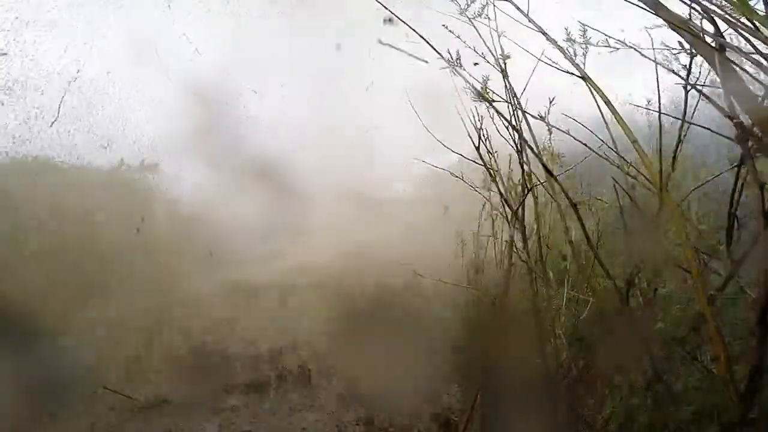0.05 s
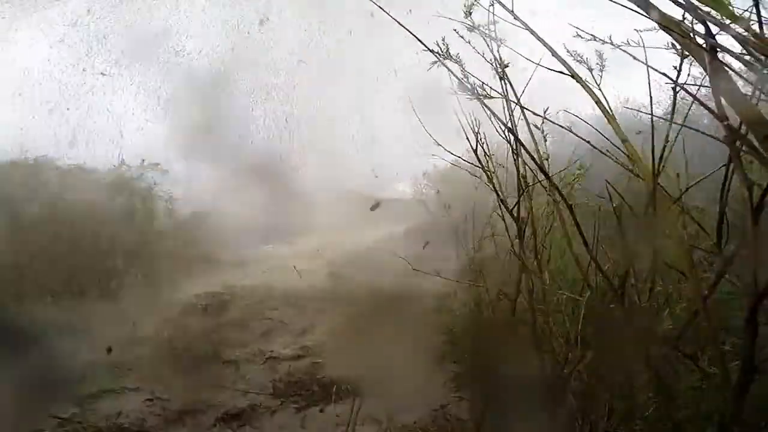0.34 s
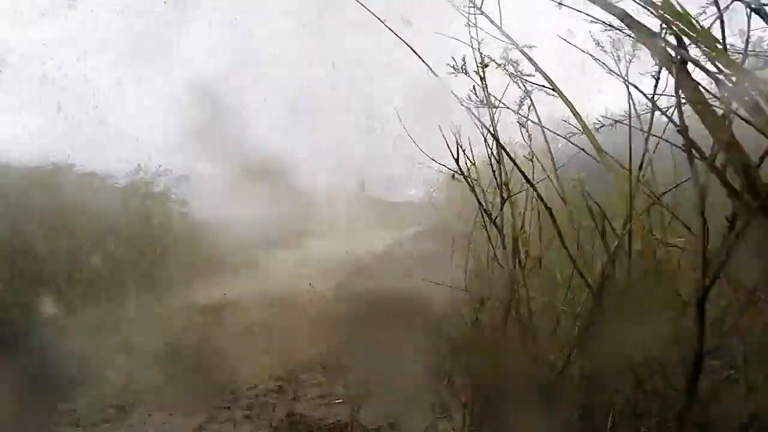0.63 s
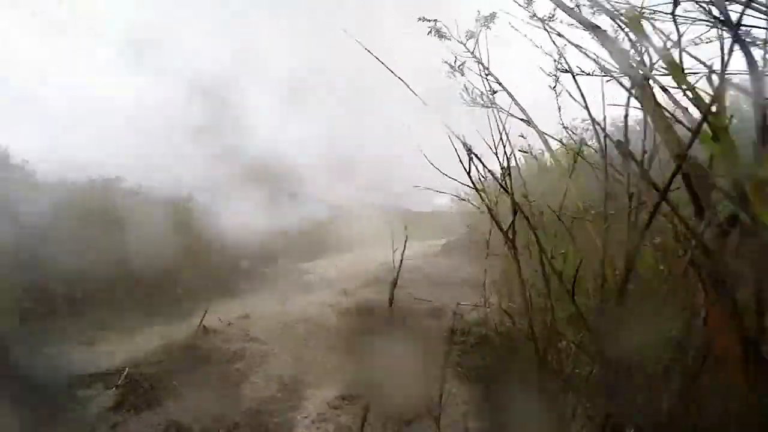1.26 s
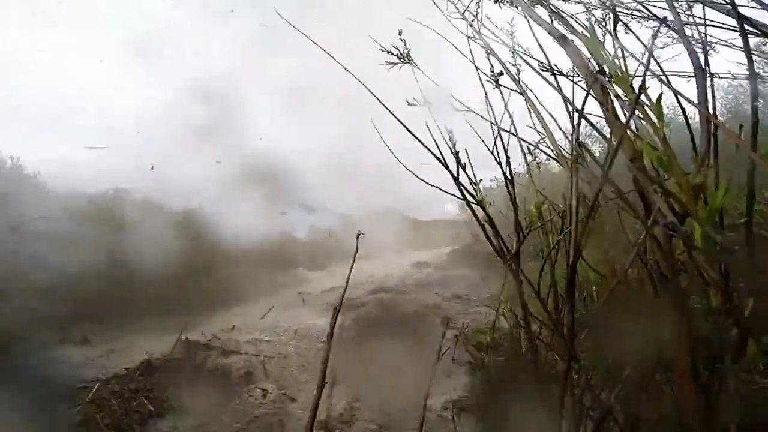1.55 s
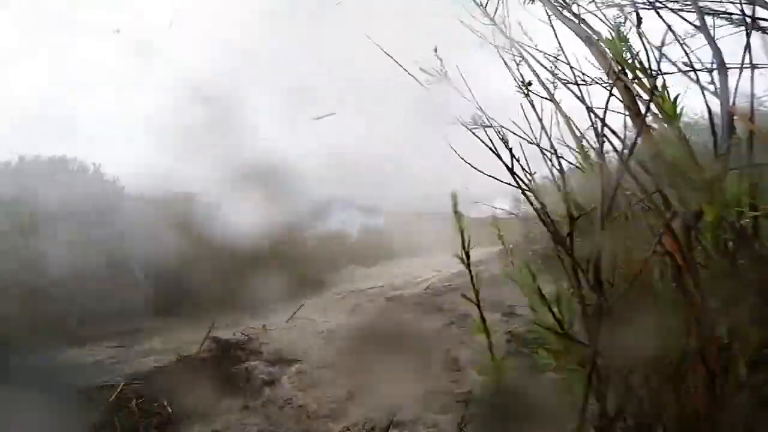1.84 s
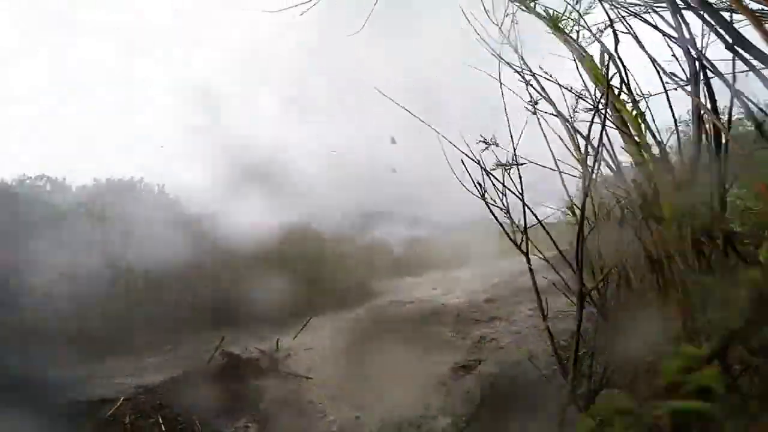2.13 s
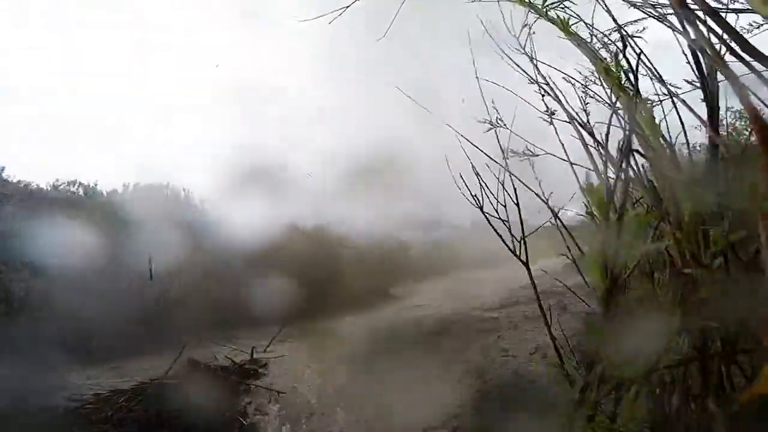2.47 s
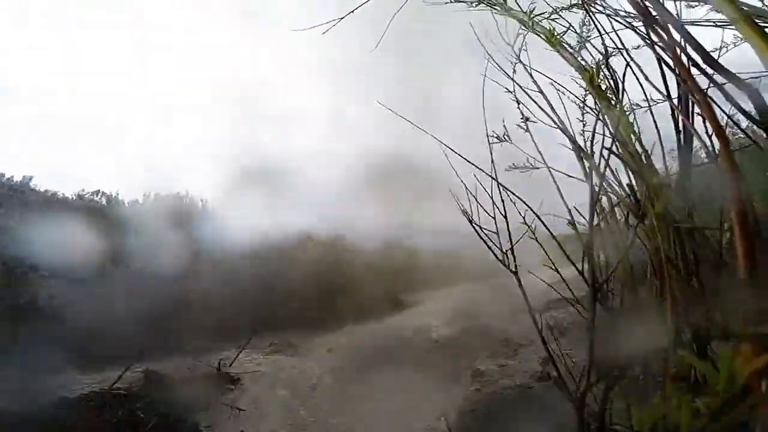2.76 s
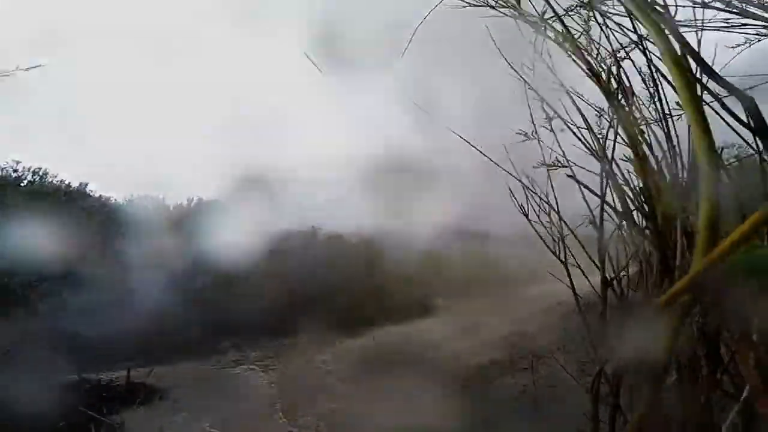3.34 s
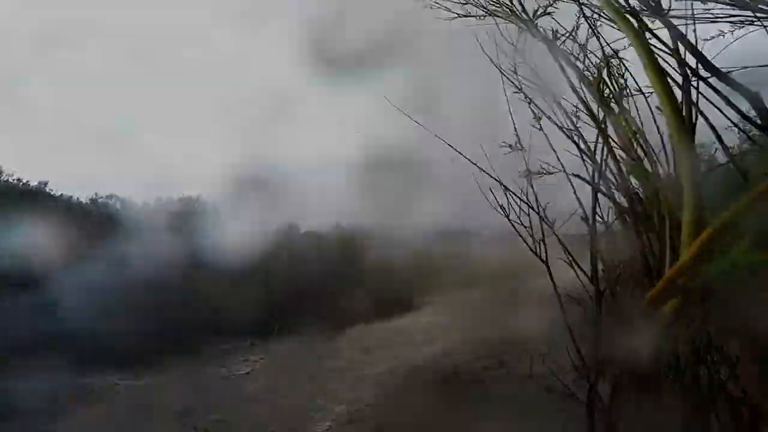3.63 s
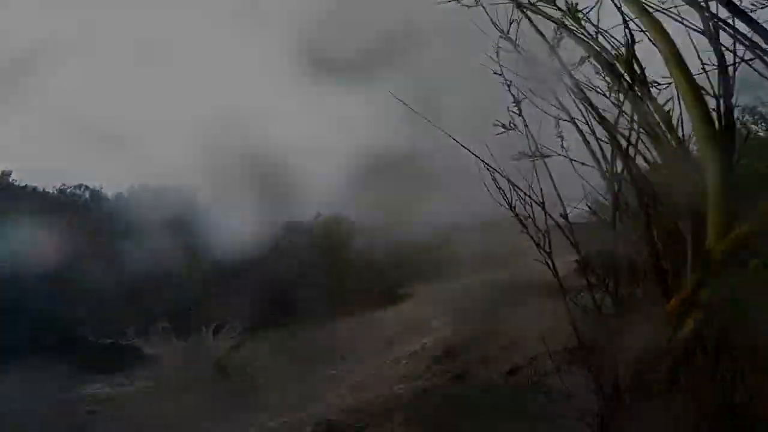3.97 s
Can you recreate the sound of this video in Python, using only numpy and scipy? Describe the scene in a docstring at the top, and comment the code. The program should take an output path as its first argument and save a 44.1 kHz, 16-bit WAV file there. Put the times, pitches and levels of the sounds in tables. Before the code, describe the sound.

Falling grit and soil patter close by, with low thumps and rumbling wind.

```python
"""On a muddy bank just after a blast, grit rains on a camera housing in dry, sharp ticks.
Each stone is a short knock with a bright snap, and fine sand prickles in between.
The ticks give way to a dense patter of soil on the ground and reeds, with a few duller clods.
Underneath, moving air and falling earth swell and boom in the housing, jolts thump it,
and deep wind pushes on the microphone."""
import sys
import numpy as np
from scipy import signal
from scipy.io import wavfile
from scipy.ndimage import uniform_filter1d

SR = 44100
rng = np.random.default_rng(int(sys.argv[2]) if len(sys.argv) > 2 else 0)


def store_wav(level_fs):
    """Save 16-bit WAV to argv[1]."""
    pcm = np.round(np.clip(np.atleast_2d(level_fs), -1, 1) * 32767)
    wavfile.write(sys.argv[1], SR, pcm.T.astype(np.int16))


N = 176400
TIME = np.arange(N) / SR

# Stones on the housing. Each row: start in seconds, knock level in dB, pitch in Hz,
# snap level in dB before its trim.
GRIT_HITS = [(0.0686, -23.5, 1800, -39), (0.079, -21.5, 2400, -25.5), (0.0877, -20, 1540, -29.5),
             (0.1508, -26.5, 2510, -26.5), (0.166, -11, 1270, -22), (0.2552, -20, 2050, -38),
             (0.277, -22.5, 1860, -30), (0.304, -16.5, 1380, -20), (.399, -22.5, 2350, -34),
             (0.42, -16.5, 2230, -28.5), (0.4343, -16, 1710, -23), (0.4503, -18, 1580, -20),
             (.461, -21, 2040, -28), (0.487, -17, 1280, -39), (0.5004, -23, 1520, -34),
             (0.523, -29, 2150, -47), (0.5792, -13.5, 2380, -20), (0.6015, -17.5, 2020, -29),
             (0.612, -17, 1300, -27), (0.628, -14.5, 1910, -20), (0.643, -11, 2100, -26.5),
             (0.68, -14.5, 1900, -31), (0.6895, -19.5, 2230, -25), (0.7171, -9, 2170, -15),
             (0.732, -10.5, 1560, -18.5), (0.75, -8, 1380, -21), (0.7536, -15.5, 1440, -19),
             (0.7665, -18, 2600, -25), (0.9269, -18, 1580, -23.5), (1.0439, -16.5, 1410, -29),
             (1.068, -31, 1380, -34.5), (1.091, -20.5, 1440, -32), (1.168, -26, 1350, -36),
             (1.2035, -17, 1880, -41), (1.3001, -18, 2200, -26.5), (1.327, -25, 1280, -29),
             (1.597, -18, 1800, -34), (3.3763, -29.5, 2160, -41)]
# Clods landing close by. Each row: start in seconds, slap level in dB, pitch in Hz, thud level in dB.
CLOD_HITS = [(0.6236, -23, 756, -20.5), (.966, -16, 1670, -24.5), (1.848, -13.5, 1515, -16),
             (1.98, -17.5, 1280, -28), (2.281, -26, 1280, -17), (2.322, -24.5, 1340, -30),
             (2.496, -30.5, 1380, -35), (3.015, -20, 1315, -38), (3.065, -19, 788, -20.5),
             (3.194, -24.5, 1550, -39), (3.796, -22.5, 2300, -28), (3.8538, -17, 1210, -9)]
# Hard specks on the housing. Each row: start in seconds, level in dB.
PING_HITS = [(1.2047, -31.5), (3.3765, -34.5), (3.645, -49)]
# Jolts to the housing. Each row: start in seconds, level in dB, pitch in Hz.
THUMP_HITS = [(.820, -13.5, 110), (1.062, -13.5, 136), (1.142, -8.5, 119.6), (1.247, -7, 110),
              (1.878, -12.5, 405), (2.002, -16, 150), (2.111, -3.5, 124), (2.195, -9.5, 140),
              (2.277, -12.5, 293), (2.343, -7, 125), (2.391, -5, 128.3), (2.593, -7.5, 123.7),
              (2.697, -13, 122), (2.97, -12, 306), (2.993, -5, 135), (3.205, -5.5, 136),
              (3.367, -3.5, 126.7), (3.479, -5.5, 143), (3.633, -4.5, 175), (3.942, -9.5, 143)]

# Fader moves for the running layers. Each row: time in seconds, level in dB.
PATTER_FADER = [(0, -45.5), (.8, -35.5), (.95, -28), (1.02, -41), (1.1, -27.5), (1.15, -34), (1.23, -23.5),
                (1.28, -42.5), (1.305, -21.5), (1.36, -24.5), (1.39, -36.5), (1.43, -23.5), (1.5, -34),
                (1.61, -20.5), (1.65, -27), (1.73, -27), (1.78, -30.5), (1.84, -24), (1.88, -24.5),
                (1.97, -24.5), (2.04, -30), (2.12, -26), (2.175, -19), (2.22, -31.5), (2.34, -28.5),
                (2.365, -43), (2.42, -43.5), (2.45, -35), (2.52, -38.5), (2.6, -31.5), (2.88, -32.5),
                (2.99, -26), (3.015, -39), (3.08, -30), (3.25, -33.5), (3.3, -29), (3.41, -34),
                (3.47, -27.5), (3.64, -32.5), (3.68, -39.5), (3.88, -35), (4, -37.5)]
SAND_FADER = [(0, -34.5), (.22, -39), (.45, -32.5), (.9, -35), (1.4, -45.5), (2.3, -43.5), (2.37, -67)]
RUMBLE_FADER = [(0, -39.5), (.36, -36), (.46, -25.5), (.56, -28.5), (.79, -29), (.85, -21), (1.04, -29),
                (1.12, -19), (1.33, -18), (1.54, -21.5), (1.9, -13.5), (2.05, -16), (2.3, -16.5),
                (2.38, -17), (2.53, -21.5), (2.92, -15), (3.045, -22.5), (3.12, -16.5), (3.42, -20),
                (3.62, -12.5), (3.69, -19), (3.75, -12), (4, -24)]
WIND_FADER = [(0, -57), (1, -30.5), (1.28, -24), (1.55, -28), (1.9, -18), (2.07, -24), (2.55, -24),
              (2.94, -20.5), (4, -26)]

# The tone of each source as an EQ curve. Each row: frequency in Hz, relative gain in dB.
KNOCK_EQ = [(100, -32), (700, -36), (1250, 14), (1750, 0.5), (2400, 9.5), (3500, 1), (6000, -47),
            (16000, -95)]  # hard midrange
SNAP_EQ = [(500, 3), (2500, -5), (4500, 8.5), (6200, 5), (9000, -9), (12500, -15.5), (16000, -27)]  # bright edge
NEAR_SOIL_EQ = [(100, -3.5), (600, -5.5), (720, 0.5), (830, -6), (1280, 3.5), (1800, -4), (2380, 0.5),
                (2750, -13.5), (3700, -15.5), (4400, -26), (7800, -32), (9000, -43), (12000, -49),
                (16000, -84)]
FAR_SOIL_EQ = [(560, -12.5), (720, 7.5), (830, -2.5), (1050, -4.5), (1280, 7), (1800, -13), (2380, -9.5),
               (2750, -19.5), (4400, -31), (7200, -39.5), (9000, -53.5), (12000, -71.5), (16000, -90)]  # duller, with less body
SAND_EQ = [(600, -10), (1300, 10), (2500, 3.5), (6500, -11), (12500, -23), (16000, -46.5)]
PING_EQ = [(2000, -46), (5500, 5.5), (9000, -12), (11300, 2), (12800, 4), (16000, -38)]  # thin treble
BOOM_EQ = [(30, -24), (70, -8.5), (100, 1), (135, 5.5), (165, -3.5), (210, -15.5), (310, -16.5), (400, -26),
           (520, -35.5), (3000, -92.5)]  # the housing's bass resonance
BUFFET_EQ = [(60, -22.5), (180, -2.5), (300, -3.5), (390, -4), (520, -21.5), (2000, -68.5)]  # soft low mids
WIND_EQ = [(12, -12.5), (24, 2.5), (50, 3), (75, -10.5), (400, -89)]  # sub-bass


def grit():
    """Small stones tick on the housing, each a knock with a bright snap."""
    out = np.zeros(N)
    snap_trim_db = -2.5
    for start, db, hz, snap_db in GRIT_HITS:
        add(out, start, amp(db) * knock(hz, KNOCK_EQ, ring_s=0.0006, ring_share=0.46, decay_s=0.0014))
        add(out, start, amp(snap_db + snap_trim_db) * crumble(SNAP_EQ, decay_s=0.0011))
    return out


def soil_patter():
    """Soil rains on ground and reeds in clumps, duller as the near fall ends."""
    clump_db = 2.6 * unit(uniform_filter1d(rng.standard_normal(N), size=500))
    crumbs = shower(per_s=1200, spread_db=3.6, grain_s=0.0012)
    wash = 0.5 * rng.standard_normal(N)
    soil = (crumbs + wash) * amp(clump_db)
    near = unit(colour(soil, NEAR_SOIL_EQ))
    far = unit(colour(soil, FAR_SOIL_EQ))
    far_share = np.interp(TIME, [1.87, 4.74], [0, 1])
    return fader(PATTER_FADER) * ((1 - far_share) * near + far_share * far)


def clods():
    """Soft lumps land with a dull slap and a low thud."""
    out = np.zeros(N)
    thud = ring(hz=321.5, decay_s=0.0027)
    for start, db, hz, thud_db in CLOD_HITS:
        slap = knock(hz, NEAR_SOIL_EQ, ring_s=0.0014, ring_share=0.51, decay_s=0.003)
        add(out, start, amp(db) * slap + amp(thud_db) * thud)
    return out


def sand():
    """Fine dry grains prickle on the housing between the stones and fade away."""
    grains = shower(per_s=380, spread_db=5.0, grain_s=0.00076)
    wash = 0.26 * rng.standard_normal(N)
    return fader(SAND_FADER) * unit(colour(grains + wash, SAND_EQ))


def pings():
    """Hard specks strike the housing with a thin, very high tick."""
    out = np.zeros(N)
    for start, db in PING_HITS:
        add(out, start, amp(db) * crumble(PING_EQ, decay_s=0.00026))
    return out


def thumps():
    """Separate jolts set the housing booming for a few cycles each."""
    out = np.zeros(N)
    for start, db, hz in THUMP_HITS:
        add(out, start, amp(db) * knock(hz, BOOM_EQ, ring_s=0.61 / hz, ring_share=0.51, decay_s=0.0041))
    return out


def rumble():
    """Moving air and falling earth boom in the housing, with growing flurries of soft buffets."""
    drift = uniform_filter1d(rng.standard_normal(N), size=2400, mode="wrap")
    drift = unit(uniform_filter1d(drift, size=2400, mode="wrap"))
    flurry_db = 4.0 * np.tanh(drift)
    impacts = shower(per_s=140, spread_db=2.5, grain_s=0.0016)
    buffets = unit(colour(impacts, BUFFET_EQ) * amp(flurry_db))
    build = amp(np.linspace(-15, -9.5, N))
    boom = steady_noise(BOOM_EQ, window=6000)
    return fader(RUMBLE_FADER) * (boom + build * buffets)


def wind():
    """Deep, uneven gusts push on the microphone."""
    return fader(WIND_FADER) * steady_noise(WIND_EQ, window=16000)


def bank_scatter(x, wet_db=-20.5):
    """The bank and the reeds add a faint, quick tail to the direct sound."""
    tail = noise_burst(decay_s=0.016, size=6000)
    return x + amp(wet_db) * signal.fftconvolve(x, tail / np.linalg.norm(tail))[:N]


def knock(hz, eq, ring_s, ring_share, decay_s):
    """A crumbling contact with a short ring of its own pitch."""
    return unit_hit(ring_share * ring(hz, ring_s) + (1 - ring_share) * crumble(eq, decay_s))


def crumble(eq, decay_s):
    """A lump breaks up on contact: a burst of tiny impacts that dies at once."""
    return unit_hit(colour(noise_burst(decay_s, size=3000), eq))


def ring(hz, decay_s, size=3000):
    """One heavily damped resonance that swells quickly and dies."""
    t = np.arange(size) / SR
    return unit_hit(np.sin(2 * np.pi * hz * t) * t * np.exp(-t / decay_s))


def shower(per_s, spread_db, grain_s, kinds=16):
    """Randomly timed impacts of uneven size; each kind of grain crumbles in its own way."""
    lands = rng.random(N) < per_s / SR
    hits = lands * amp(spread_db * np.minimum(rng.exponential(1, N), 3.5))
    kind = rng.integers(0, kinds, N)
    grains = [unit_hit(noise_burst(grain_s, size=512)) for _ in range(kinds)]
    return unit(sum(signal.oaconvolve(hits * (kind == k), grains[k])[:N] for k in range(kinds)))


def noise_burst(decay_s, size):
    """White noise with an instant attack and an exponential decay."""
    return rng.standard_normal(size) * np.exp(-np.arange(size) / SR / decay_s)


def steady_noise(eq, window):
    """Coloured noise with its slow swings evened out over a window of samples."""
    noise = colour(rng.standard_normal(N + SR), eq)
    power = uniform_filter1d(noise ** 2, size=window)
    return (noise / np.sqrt(power + 1e-12))[-N:]


def colour(x, eq, size=8192):
    """Plays a sound through a minimum-phase EQ, which keeps attacks sharp."""
    hz, db = np.transpose(eq)
    bin_hz = abs(np.fft.fftfreq(size, 1 / SR))
    gain = amp(np.interp(np.log(bin_hz + 1), np.log(hz), db))
    response = np.exp(np.conj(signal.hilbert(np.log(gain))))
    taps = np.fft.ifft(response).real[:size // 2]
    return signal.fftconvolve(x, taps)[:len(x)]


def amp(db):
    """Decibels to gain."""
    return 10 ** (np.asarray(db) / 20)


def unit(x):
    """Scales to rms 1."""
    return x / np.sqrt(np.mean(x ** 2) + 1e-20)


def unit_hit(x, size=190):
    """Gives a hit the energy of `size` samples at rms 1."""
    return x / np.sqrt(np.sum(x ** 2) / size + 1e-20)


def fader(points):
    """Gain that glides through points of time and level."""
    return amp(np.interp(TIME, *np.transpose(points)))


def add(mix, start_s, sound):
    """Drops a sound into the mix at its start time."""
    part = mix[max(round(start_s * SR), 0):][:len(sound)]
    part += sound[:len(part)]


def scene():
    """All the falling debris over the thumps, the rumble and the wind, in mono."""
    close_debris = bank_scatter(grit() + clods() + sand())
    return (close_debris + pings() + soil_patter() + thumps() + rumble() + wind())[None]


def record(dry):
    """The loudest peaks overload the microphone; a steep low-pass takes off the very top."""
    clipped = np.clip(dry, -1, 1)
    low_pass = signal.firwin(511, cutoff=16300, window=("kaiser", 9), fs=SR)
    return signal.oaconvolve(clipped, low_pass[None], "same")


dry = scene()
out = record(dry)
store_wav(out)
```